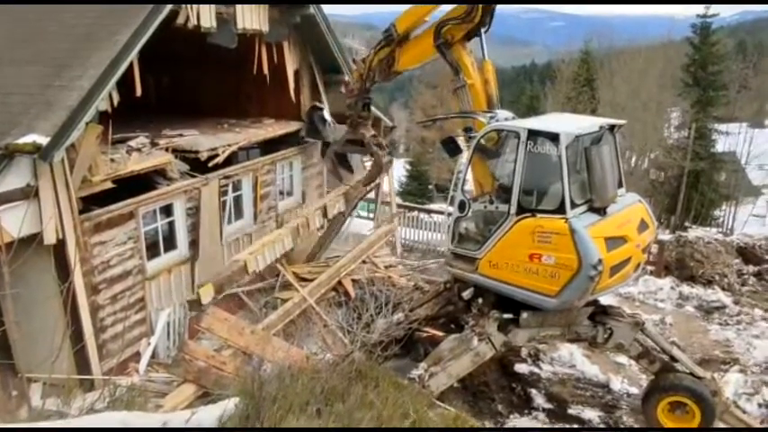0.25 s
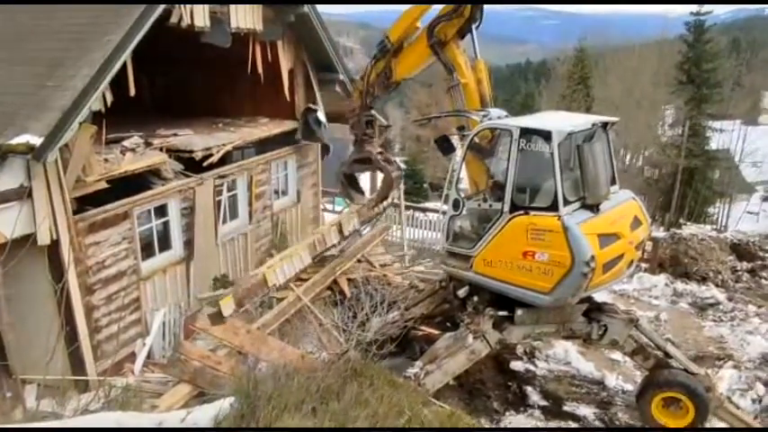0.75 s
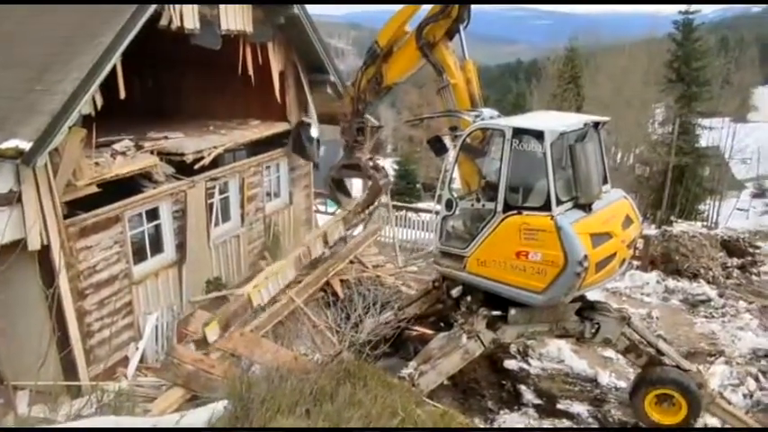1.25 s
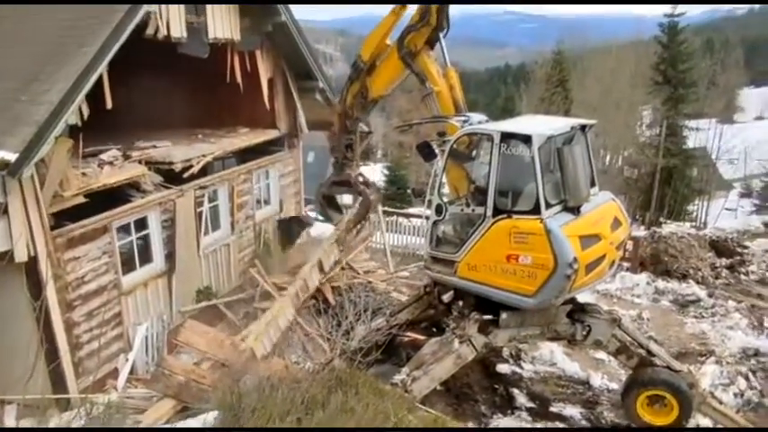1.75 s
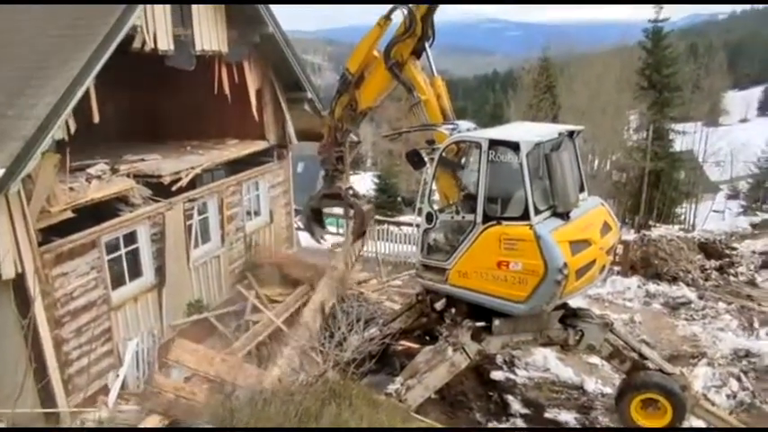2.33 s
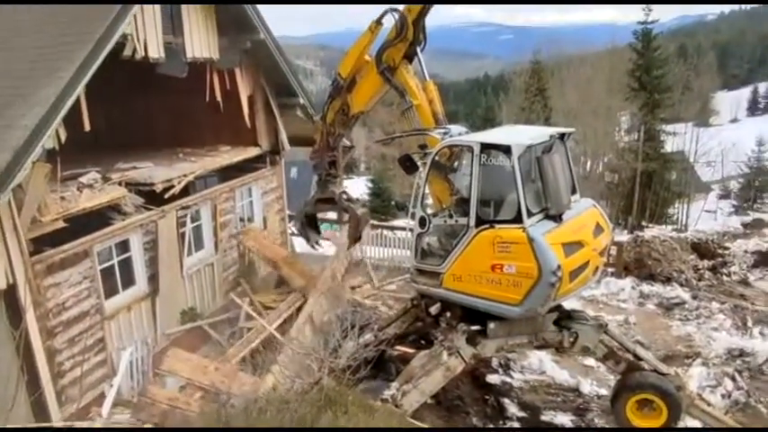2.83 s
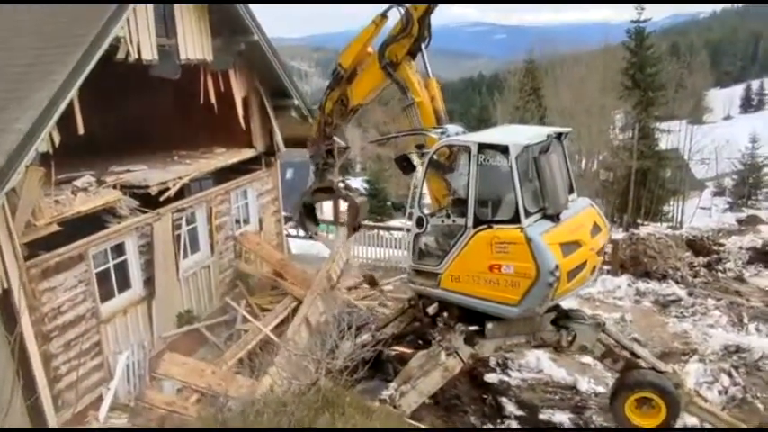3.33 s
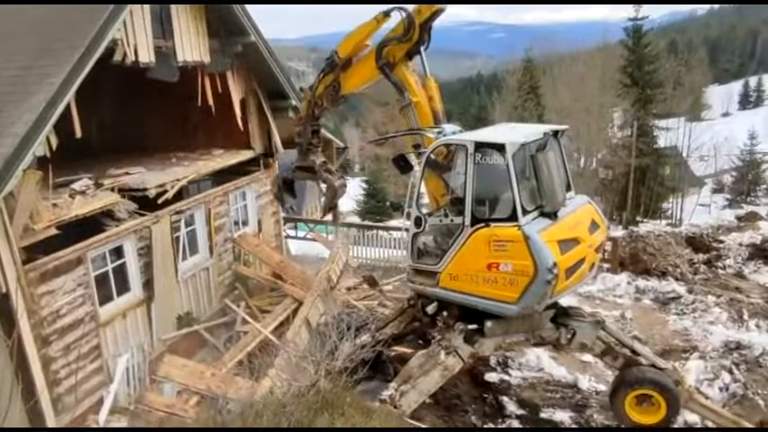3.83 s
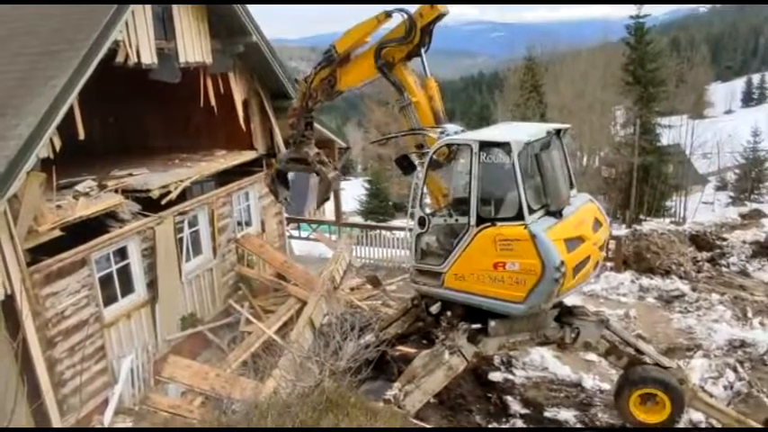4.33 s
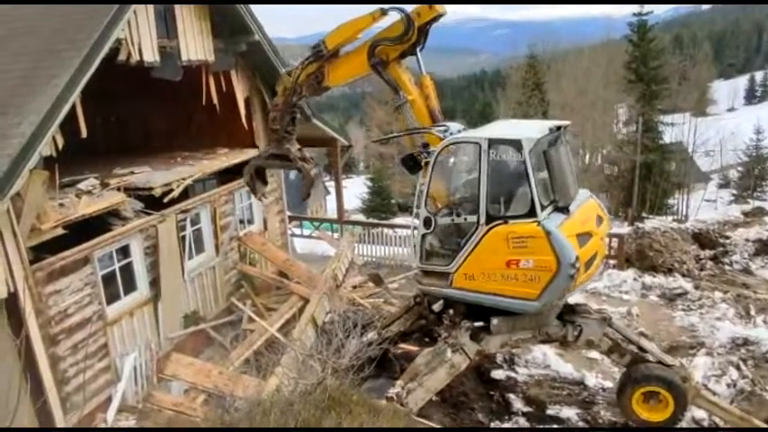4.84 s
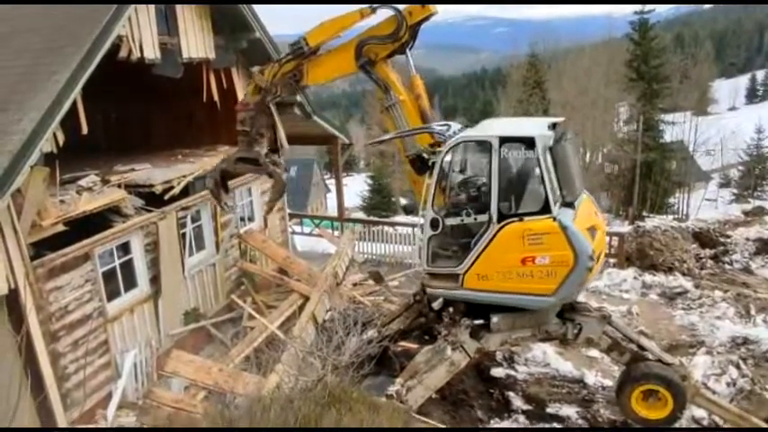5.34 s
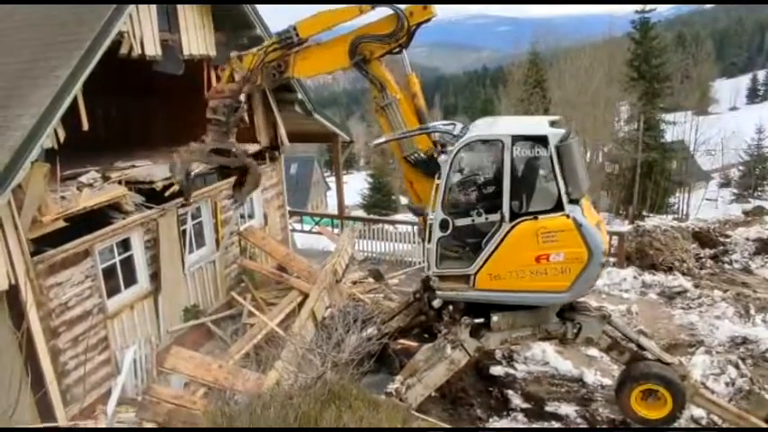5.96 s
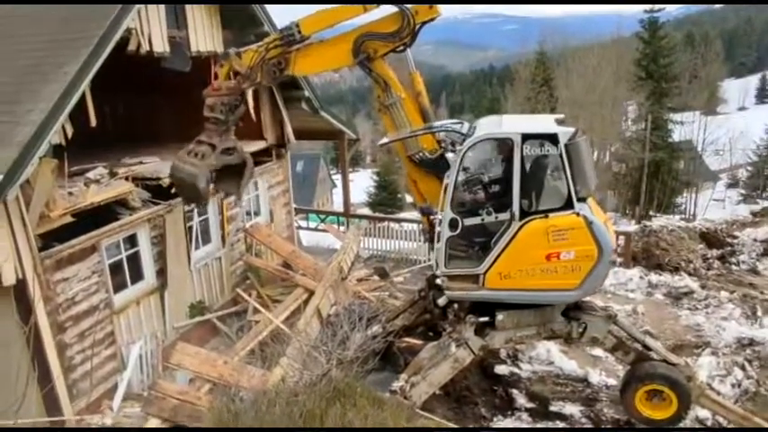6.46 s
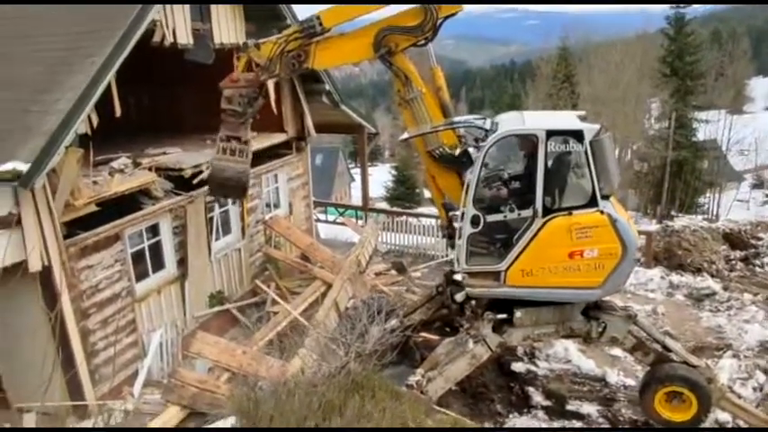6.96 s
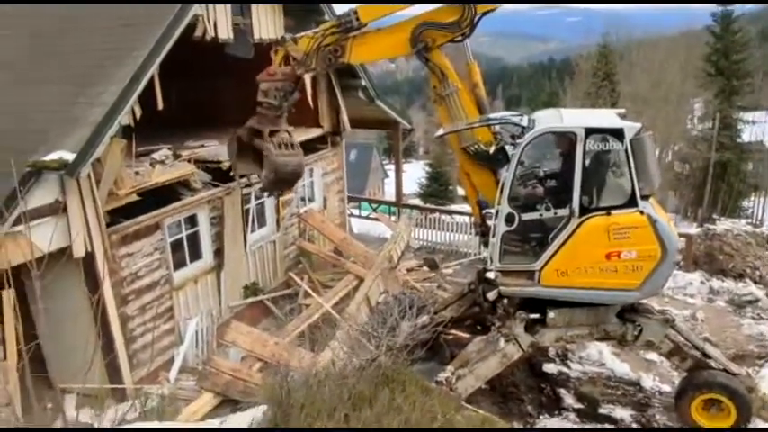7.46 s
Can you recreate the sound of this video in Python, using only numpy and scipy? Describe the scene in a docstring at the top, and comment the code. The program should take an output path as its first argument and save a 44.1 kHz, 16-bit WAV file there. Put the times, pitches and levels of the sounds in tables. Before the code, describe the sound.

An excavator's diesel engine runs steadily while wooden boards crack, splinter and clatter down, followed by faint hydraulic hisses.

```python
"""Excavator tearing up a wooden house.

A compact excavator's diesel runs steadily, slightly right: exhaust hum, pump whine, fan roar, valve hiss.
Under its grapple fibres snap and boards ring and thud; splinters and rubble clatter and die away.
The house wall throws the blows back. Light wind rumbles on the two microphone ports."""
import sys
import numpy as np
from scipy import signal
from scipy.fft import rfft, irfft
from scipy.io import wavfile
from scipy.ndimage import uniform_filter1d

SR = 44100
rng = np.random.default_rng(int(sys.argv[2]) if len(sys.argv) > 2 else 0)


def to_wav(sig):
    """Store sig (one row per channel, or 1-D mono) as 16-bit WAV at the path in sys.argv[1].

    Samples outside -1..1 are clipped; the rate is SR.
    """
    pcm = np.clip(np.atleast_2d(sig), -1, 1) * 32767
    pcm = np.round(pcm).astype(np.int16)
    wavfile.write(sys.argv[1], SR, pcm.T)  # frames by channels


N = 339570

# wind gusts (peak time [s], level [dB])
GUSTS = [(0.021, -45), (1.558, -26), (1.97, -37), (2.6, -40), (2.74, -31), (2.93, -25.5), (3.6, -31.5),
         (4.11, -29), (4.6, -31), (4.72, -30), (4.85, -29), (4.96, -37), (7.06, -48), (7.27, -31.5),
         (7.38, -34.5), (7.45, -32), (7.55, -34.5)]
# fan roar and valve noise (frequency [Hz], left-right coherence [0..1])
MACHINE_COHERENCE = [(60, 0.96), (250, 1), (700, 0.99), (1500, 0.57), (4000, 0.09), (12000, 0.15)]
# board modes (frequency [Hz], width [Hz], level [dB])
BOARD_MODES = [(348, 30, 4), (766, 196, 7), (807, 81, 10.5), (1025, 121, 6.5), (1327, 110, 3.5),
               (1607, 133, 7), (2000, 410, -1), (2295, 254, 5.5), (3330, 4200, -5)]
# spectrum of the smallest splinters (frequency [Hz], level [dB])
GRIT_SPECTRUM = [(1500, -23), (3000, 4.5), (5000, 6), (7000, 3.5), (8500, 1.5), (9800, -9), (12000, -5),
                 (14400, -11)]


def gain_of(db):
    return 10 ** (np.asarray(db) / 20)


def unit_rms(x):
    return x / np.sqrt(np.mean(x ** 2) + 1e-20)


def at_hz(points, hz):
    f, value = np.transpose(points)
    return np.interp(np.log(hz + 1), np.log(f + 1), value)


def curves(rows):
    times_s, *columns = np.transpose(rows)
    return [np.interp(np.arange(N) / SR, times_s, column) for column in columns]


def add(mix, start_s, sound):
    part = mix[:, round(start_s * SR):][:, :sound.shape[1]]
    part += sound[:, :part.shape[1]]


def wander(top_hz):
    """Random drift of rms 1 over the decade below top_hz."""
    t = np.arange(0, N + 64, 64) / SR
    rates_hz = np.geomspace(.1 * top_hz, top_hz, 16)
    drift = sum(np.sin(2 * np.pi * (hz * t + rng.random())) / np.sqrt(hz) for hz in rates_hz)
    return np.repeat(unit_rms(drift), 64)[:N]


def noise(spectrum, coherence, patchy_db):
    """Stereo noise of rms 1 with drifting spectral patches."""
    frames, hz = N // 256 + 5, np.fft.rfftfreq(1024, 1 / SR)
    a, b, c, d, patches = rng.standard_normal((frames, 513, 5)).T
    patches = unit_rms(uniform_filter1d(uniform_filter1d(patches, size=8, axis=0), size=8, axis=1))
    same = np.clip(coherence(hz), 0, 1)[:, None]
    left = a + 1j * b
    right = same * left + np.sqrt(1 - same ** 2) * (c + 1j * d)
    spectra = np.array([left, right]) * gain_of(at_hz(spectrum, hz)[:, None] + patchy_db * patches)
    return unit_rms(signal.istft(spectra, nperseg=1024, noverlap=768)[1][:, :N])


def gust_shapes(rise_s=0.063, fall_s=0.065):
    """One swell and drop of height 1 per gust."""
    t = np.arange(N) / SR
    return np.array([np.exp(-np.maximum((s - t) / rise_s, (t - s) / fall_s)) for s, _ in GUSTS])


def wind():
    """Lumpy, gusting rumble that strikes the right port harder."""
    # rumble (frequency [Hz], density [dB])
    spectrum = [(20, 1), (40, 13.5), (100, 12.5), (200, 9), (350, -1.5), (700, -64)]
    # breeze between gusts (time [s], level [dB])
    breeze = [(0, -36), (1.4, -57), (1.55, -39.5), (5.6, -39), (6.1, -57), (6.3, -40.5), (7.7, -40)]
    gusting = gain_of([db for _, db in GUSTS]) @ gust_shapes()
    strength = np.hypot(gain_of(curves(breeze)[0]), gusting)
    lumps_db, side_db = 1.3 * wander(25), np.array([[-2.75], [2.75]])
    return strength * gain_of(lumps_db + side_db) * noise(spectrum, lambda f: .5 + 0 * f, patchy_db=1.5)


def valve_hiss():
    """Oil hisses through the valves as the arm moves; a nearly shut valve whistles."""
    # open valve (frequency [Hz], density [dB])
    hiss_spectrum = [(1500, -13), (2800, 2.5), (3500, -1.5), (4000, -5), (4900, 1), (5400, -5), (7600, -25),
                     (9000, -19)]
    # hisses (start [s], length [s], level [dB])
    hisses = [(3.9, 0.9, -59), (4.94, 1, -58), (6.115, 0.25, -55), (6.724, 0.4, -55.5),
              (7.451, 0.41, -53.5)]
    # nearly shut valve (frequency [Hz], density [dB])
    whistle_spectrum = [(2800, -28), (3300, -1), (3550, 4), (3800, -12), (4300, -27)]
    # whistles (start [s], length [s], level [dB])
    whistles = [(5.0, .36, -59.5), (7.43, .4, -59)]
    t = np.arange(N) / SR

    def flow(openings, spectrum, ramp_s, patchy_db):
        level = sum(gain_of(db) * np.clip(np.minimum(t - s, s + length_s - t) / ramp_s + .5, 0, 1)
                    for s, length_s, db in openings)
        return level * noise(spectrum, lambda f: at_hz(MACHINE_COHERENCE, f), patchy_db)

    hiss = flow(hisses, hiss_spectrum, ramp_s=.16, patchy_db=1)
    return hiss + flow(whistles, whistle_spectrum, ramp_s=.04, patchy_db=2)


def fan_roar(firing_rad):
    """Casing and fan noise, throbbing a little with each firing."""
    # roar (frequency [Hz], density [dB])
    spectrum = [(20, -1.5), (100, -1.5), (270, -2.5), (450, -7), (640, -16.5), (900, -12), (1200, -16),
                (1400, -14), (2000, -22.5), (3300, -30), (4900, -28.5), (5500, -34.5), (7600, -32.5),
                (8600, -45.5), (14400, -53.5)]
    # roar as the hydraulics work (time [s], level [dB])
    levels = [(0, -35), (3.9, -35.5), (4.6, -35.5), (5.3, -38), (6, -39.5), (6.8, -40.5), (7.3, -40),
              (7.7, -38)]
    throb = 1 + .1 * np.cos(firing_rad)
    roar = noise(spectrum, lambda f: at_hz(MACHINE_COHERENCE, f), patchy_db=1)
    return gain_of(curves(levels)[0]) * throb * roar


def exhaust(firing_rad, first_db):
    """Two firing harmonics; their phase drifts between the ports and their level dips at each gust."""
    first_light_load_db, second_light_load_db, gust_dip_db = -32, -31.5, -1.5
    drift_rad = np.array([.45 * wander(3.9), np.zeros(N)])
    second_db = second_light_load_db + 0.34 * (first_db - first_light_load_db) + 0.83 * wander(6)
    first = gain_of(first_db) * np.sin(firing_rad + drift_rad)
    second = gain_of(second_db) * np.sin(2 * firing_rad + 1.6 + drift_rad)
    return (first + second) * gain_of(gust_dip_db * gust_shapes().max(0))


def whine(firing_rad):
    """Weak engine tones, shaken by uneven firing, and clean tones of the nine-piston pump."""
    # tones (multiple of firing rate [1], level [dB], waver [dB])
    partials = [(2.5, -52.5, 2.5), (3, -47.5, -3), (3.45, -51, -0.5), (4.41, -46.5, 2), (9, -55, 1.2),
                (13.3, -65, -6)]
    # pump whine under pressure (time [s], boost [dB])
    pump_boost = [(3.8, 3), (4.5, 4.5), (5.1, 6), (5.9, -3), (7, 1.5)]
    boost_db, = curves(pump_boost)
    out = np.zeros(N)
    for multiple, db, waver_db in partials:
        is_pump = multiple > 8.5
        level = gain_of(db + is_pump * boost_db + waver_db * wander(8))
        phase_rad = multiple * firing_rad + 2 * np.pi * rng.random()
        shake_rad = (0 if is_pump else .65) * wander(30)
        out += level * np.sin(phase_rad + shake_rad)
    return out


def excavator(left_lag_samples=8):
    """Diesel and hydraulics under changing load, louder and earlier at the right port."""
    # engine load (time [s], firing rate [Hz], first exhaust tone [dB])
    load = [(0.0, 58.24, -23.5), (0.49, 59.14, -26.5), (0.79, 62.23, -33.5), (1.93, 62, -38.5),
            (2.06, 61.5, -34), (2.44, 60.68, -31), (2.7, 61.95, -40.5), (3.13, 59.1, -27.5),
            (3.3, 61.1, -32), (3.5, 59.37, -33), (3.67, 59.54, -23), (3.86, 60.4, -31), (4.16, 61.13, -31),
            (5.32, 61.46, -33.5), (5.57, 58.9, -31), (5.81, 61.34, -34), (7.23, 61.98, -35),
            (7.7, 59.64, -35)]
    firing_hz, first_db = curves(load)
    firing_rad = 2 * np.pi * np.cumsum(firing_hz * (1 + 0.0067 * wander(17))) / SR
    tones = exhaust(firing_rad, first_db) + whine(firing_rad)
    rush = fan_roar(firing_rad) + valve_hiss()
    left, right = np.sqrt(2) * tones * gain_of([[-.7], [.7]]) + rush * gain_of([[-.8], [.8]])
    return np.array([np.roll(left, left_lag_samples), right])


def wood_at_ports(spectra, hz, right_lag_samples=2):
    """Two unrelated spectra become a stereo pair, alike in the bass and apart in the treble."""
    # wood (frequency [Hz], left-right coherence [0..1])
    coherence = [(300, 1), (1000, 0.83), (2000, 0.33), (4000, 0.092), (8000, 0.048)]
    # wood (frequency [Hz], left minus right [dB])
    balance = [(60, -7), (130, 1), (280, -0.5), (620, 5), (1340, -4.5), (2930, -3.5), (6370, -6),
               (9000, -0.5), (13800, -5.5)]
    same, lean = np.clip(at_hz(coherence, hz), 0, 1), gain_of(at_hz(balance, hz) / 2)
    delay = np.exp(-2j * np.pi * hz * right_lag_samples / SR)
    right = same * spectra[0] + np.sqrt(1 - same ** 2) * spectra[1]
    return np.array([lean * spectra[0], right / lean * delay])


def wall_echo(wood):
    """Sparse reflections, each band dying at its own rate; three tails crossfade as the blows move."""
    # house and yard (frequency [Hz], T60 [s])
    decay = [(300, 0.49), (1000, 0.22), (3000, 0.19), (8000, 0.22)]
    out, crossfade_rad = np.zeros((2, N)), np.pi * np.arange(N) / SR * 3.7
    for k in range(3):
        taps = np.zeros((2, SR // 2))
        delays = np.arange(200, SR // 2 - 20, 20) + rng.integers(0, 20, (2, (SR // 2 - 201) // 20))
        np.put_along_axis(taps, delays, rng.choice([-1., 1.], delays.shape), 1)
        hz, t, spectra = signal.stft(taps, SR, nperseg=256)
        t60_s = np.clip(at_hz(decay, hz), .03, 2)[:, None]
        spectra = wood_at_ports(spectra, hz[:, None]) * gain_of(-60 * t / t60_s)
        tail = signal.istft(spectra, SR, nperseg=256)[1]
        send = np.sqrt(2 / 3) * np.cos(crossfade_rad + k * np.pi / 3) * wood.mean(0)
        out += signal.fftconvolve(send[None], tail / np.linalg.norm(tail[0]), axes=1)[:, :N]
    return out


def sizzle(start_s=0.0082, rise_s=0.032, fade_s=0.14, level_db=-42.5):
    """Thin, patchy hiss while the first boards tear."""
    # narrow treble band (frequency [Hz], density [dB])
    spectrum = [(9800, -30), (10500, -1), (11000, 5), (11600, -16), (12500, -32)]
    t = np.maximum(np.arange(N) / SR - start_s, 0)
    envelope = np.minimum(t / rise_s, 1) * np.exp(-(t / fade_s) ** 2)
    return gain_of(level_db) * envelope * noise(spectrum, np.zeros_like, patchy_db=-1)


def board_response(hz, mode_scale, ring_hz, hollow_db):
    """Board modes scaled by its size; a hollow blow lifts the struck mode and mutes the rest."""
    hollow_db = max(hollow_db, 0)
    struck = np.argmin([abs(np.log(mode[0] * mode_scale / ring_hz)) for mode in BOARD_MODES])
    half_width_hz = ring_hz / (12 + hollow_db)
    out = (-1.) ** struck * gain_of(.8 * hollow_db - 7) / (1 + 1j * (hz - ring_hz) / half_width_hz)
    for k, (mode_hz, width_hz, db) in enumerate(BOARD_MODES):
        scaled_hz, damped_width_hz = mode_hz * mode_scale, max(width_hz, .11 * mode_hz)
        mute_db = -min(hollow_db, 15) * abs(np.log2(scaled_hz / ring_hz))
        out += (-1) ** k * gain_of(db + mute_db) / (1 + 2j * (hz - scaled_hz) / damped_width_hz)
    return out / (1 + 1j * hz / (3.15 * ring_hz)) ** 2


def rubble(board_sizes=16, hits_per_size_hz=35, settle_s=0.32):
    """Small pieces knock and snap at random, a few of them loudly, then come to rest."""
    # tearing fibres and sliding rubble (time [s], knock level [dB])
    slide = [(0.0, -33.5), (0.05, -26.5), (0.27, -28.5), (0.44, -39.5), (0.62, -38), (0.99, -37.5),
             (1.7, -47), (2.19, -40.5), (2.41, -33.5), (2.65, -41), (3.04, -33.5), (3.5, -46), (3.91, -45),
             (4.4, -48)]
    usual_knocks_db, usual_snaps_db = -43, -53
    knocks_db, = curves(slide)
    snaps_db = usual_snaps_db + 0.56 * (knocks_db - usual_knocks_db)
    settling = np.clip((slide[-1][0] - np.arange(N) / SR) / settle_s, 0, 1)
    hz = np.fft.rfftfreq(4096, 1 / SR)
    knocks, snaps = np.zeros((2, 2, N))
    for _ in range(board_sizes):
        strength = gain_of(3.3 * np.minimum(rng.exponential(1, N), 5)) * rng.choice([-1, 1], N)
        burst = wood_at_ports(rfft(rng.standard_normal((2, 4096)) * np.exp(-np.arange(4096) / 380)), hz)
        board = board_response(hz, rng.uniform(0.792, 0.96), rng.uniform(800, 1900), hollow_db=0)
        for layer, response in (knocks, board), (snaps, gain_of(at_hz(GRIT_SPECTRUM, hz))):
            piece = unit_rms(irfft(burst * response)[:, :2048])
            hits = strength * (rng.random(N) < hits_per_size_hz / SR)
            add(layer, 0, signal.oaconvolve(hits[None], piece, axes=1))
    return settling * (gain_of(knocks_db) * unit_rms(knocks) + gain_of(snaps_db) * unit_rms(snaps))


def splinter(peak_db, pitch_hz, rise_s=.0005, fade_s=.0035):
    """A splinter flies off: a bright snap that favours its own pitch."""
    t, hz = np.arange(2048) / SR, np.fft.rfftfreq(2048, 1 / SR)
    resonance = 1 / (1 + 2j * (hz - pitch_hz) / (.3 * pitch_hz))
    colour = gain_of(at_hz(GRIT_SPECTRUM, hz)) * (gain_of(-12) + resonance)
    burst = rng.standard_normal((2, len(t))) * (1 - np.exp(-t / rise_s)) * np.exp(-t / fade_s)
    snap = irfft(wood_at_ports(rfft(burst), hz) * colour)
    return gain_of(peak_db) * snap / abs(snap).max()


def crack(level_db, ring_hz, treble_db, thud_db, length_s):
    """A flurry of snapping fibres rings the board, spits treble and, in heavy falls, thuds."""
    # splintering treble (frequency [Hz], level [dB])
    spit_spectrum = [(900, -1.5), (1800, 8), (3000, 2), (5000, 5.5), (7000, 5.5), (8500, -1.5), (9800, -10),
                     (11000, -13.5), (14400, -17)]
    t, hz = np.arange(8192) / SR, np.fft.rfftfreq(8192, 1 / SR)
    white = rng.standard_normal((3, len(t)))
    length_s = np.clip(length_s, .003, .06)
    flurry = (1 - np.exp(-t / (0.2516 * length_s))) * np.exp(-(t / length_s) ** 0.89)
    bundles_db = 3.5 * unit_rms(uniform_filter1d(white[2, ::-1], size=60))  # fibres go in bundles
    fibres = flurry * white[:2] * gain_of(4.2 * white[2] + bundles_db)
    spray = wood_at_ports(rfft(fibres), hz)
    shortness = max(np.log2(.009 / length_s), 0)  # halvings below 9 ms
    fibres[:, flurry.argmax()] += 2 * shortness * np.linalg.norm(fibres[0])  # short: mostly one knock
    blow = wood_at_ports(rfft(fibres), hz)
    nearest_mode_hz = min((mode[0] for mode in BOARD_MODES), key=lambda f: abs(np.log(f / ring_hz)))
    hollow_db = 1 - .33 * level_db + 22 * shortness  # soft or short blows ring hollower
    ring = irfft(blow * board_response(hz, ring_hz / nearest_mode_hz, ring_hz, hollow_db))
    spit = irfft(spray * gain_of(at_hz(spit_spectrum, hz)))
    thud = irfft(blow / (1 + 1j * (hz - 260) / 95) ** 2)
    mix = unit_rms(ring) + gain_of(treble_db) * unit_rms(spit) + gain_of(thud_db) * unit_rms(thud)
    return gain_of(level_db) * np.sqrt(np.mean(flurry ** 2)) * mix


def scene():
    """Breaking wood and its echo over the excavator and the wind."""
    # cracks and blows (time [s], level [dB], ring [Hz], treble re ring [dB], thud re ring [dB], length [s])
    cracks = [(0.028, -13.5, 2360, -17, -26, 0.017), (0.031, -2.5, 1026, -14, -43, 0.013),
              (0.129, -23, 950, -4, -2, 0.025), (0.163, -17.5, 1020, -4.5, -29, 0.018),
              (0.182, -10.5, 1730, -21, -18, 0.029), (0.201, -18, 387, -30, -20, 0.033),
              (0.212, -11, 1437, -21, -30, 0.03), (0.226, -12, 1530, -16, -32, 0.004),
              (0.236, -7.5, 1530, -18, -28, 0.00564), (0.242, -17.5, 1280, -9, -17, 0.012),
              (0.268, -23, 1330, -6, 5, 0.018), (0.286, -10, 1580, -13, -25, 0.022),
              (0.295, -24, 385, -36, -24, 0.071), (0.32, -11, 1370, -15, -42, 0.024),
              (0.331, -12, 1366, -17, -34, 0.014), (0.346, -11, 1700, -14.5, -28, 0.016),
              (0.374, -16, 1880, -22, -30, 0.0042), (0.448, -11, 1788, -9.5, -9, 0.011),
              (0.49, -11, 1690, -9, -8.5, 0.015), (0.531, -29, 1420, 6.5, -19, 0.027),
              (0.548, -8, 1459, -17.5, -10.5, 0.015), (0.647, -10.5, 1570, -7.5, -14, 0.0095),
              (0.871, -26.5, 1390, -18, -20, 0.01), (0.99, -20, 1462, -14, -31, 0.012),
              (1.053, -28, 1560, -10.5, 1, 0.0066), (1.148, -27.5, 912, -3, -19, 0.0075),
              (1.416, -28.5, 1320, -10, -12, 0.027), (1.621, -26.5, 1280, -17, -20, 0.0092),
              (1.78, -13.5, 1260, -9, -53, 0.01), (1.873, -26, 850, -12, -18, 0.011),
              (1.988, -37, 1310, -25, -25, 0.011), (2.044, -32, 778, 1.5, -17, 0.014),
              (2.055, -35.5, 750, 0, 4, 0.032), (2.19, -26, 2960, -10, -15, 0.0078),
              (2.254, -24, 1940, -6, 5, 0.021), (2.269, -10.5, 2060, -4, -8.5, 0.015),
              (2.283, -14.5, 1024, -26, -7, 0.017), (2.313, -13, 1660, -22, -5.5, 0.019),
              (2.324, -21, 660, -30, -4, 0.012), (2.369, -13.5, 1270, -19, -27, 0.0092),
              (2.5135, -10.5, 2382, -20, -43, 0.0042), (2.5139, -6, 1703, -4, -43, 0.0055),
              (2.524, -16.5, 1667, 1, -43, 0.0075), (2.525, -17, 2370, -10, -41, 0.0045),
              (2.712, -28, 1280, -22, -27, 0.0072), (2.764, -31.5, 2300, -3, -15, 0.017),
              (2.844, -21, 1080, -16, -2, 0.01), (2.934, -26, 1465, -18, -4, 0.0081),
              (3.005, -21.5, 1010, -32, -3, 0.0086), (3.104, -22.5, 880, -13, -2, 0.0078),
              (3.19, -20, 1230, -14, 5, 0.0075), (3.199, -17.5, 775, -17, -5.5, 0.0086),
              (3.35, -23.5, 1054, -24, -6, 0.0082), (3.461, -27.5, 886, -14, -2, 0.019),
              (3.75, -25.5, 1713, -13, -4, 0.026), (3.817, -29.5, 830, -12, -6, 0.021),
              (5.329, -25.5, 784, -40, -28, 0.0063), (5.331, -28, 1010, -38, -25, 0.00555),
              (5.349, -27.5, 1010, -35, -25, 0.0055), (7.676, -33.5, 2970, -13, -19, 0.0098)]
    # single splinters (time [s], peak [dB], pitch [Hz])
    splinters = [(0.125, -18, 6000), (0.16, -17.5, 6300), (.273, -19.5, 5000), (.5614, -15, 6200),
                 (0.9466, -25, 5000), (1.085, -31, 7500), (1.347, -22, 7300), (1.3912, -22, 6960),
                 (1.4207, -31.5, 6000), (1.976, -39, 5000), (2.0406, -22, 5600), (2.1116, -24.5, 8600),
                 (2.189, -22, 3600), (2.1985, -25, 3100), (2.765, -28.5, 7300), (2.86, -24, 7050),
                 (3.079, -23, 3800), (3.096, -24.5, 6026), (3.309, -25, 6570)]
    wood = rubble()
    for time_s, *blow in cracks:
        add(wood, time_s - .004, crack(*blow))
    for time_s, peak_db, pitch_hz in splinters:
        add(wood, time_s - .002, splinter(peak_db, pitch_hz))
    return wood + gain_of(-10) * wall_echo(wood) + excavator() + wind() + sizzle()


def record(dry, ceiling=1.1, cutoff_hz=14450):
    """The converter rounds off the loudest peaks; a steep low-pass follows."""
    lowpass = signal.firwin(1023, cutoff_hz, window=("kaiser", 8), fs=SR)
    return signal.oaconvolve(ceiling * np.tanh(dry / ceiling), lowpass[None], "same")


dry = scene()
out = record(dry)
to_wav(out)
```